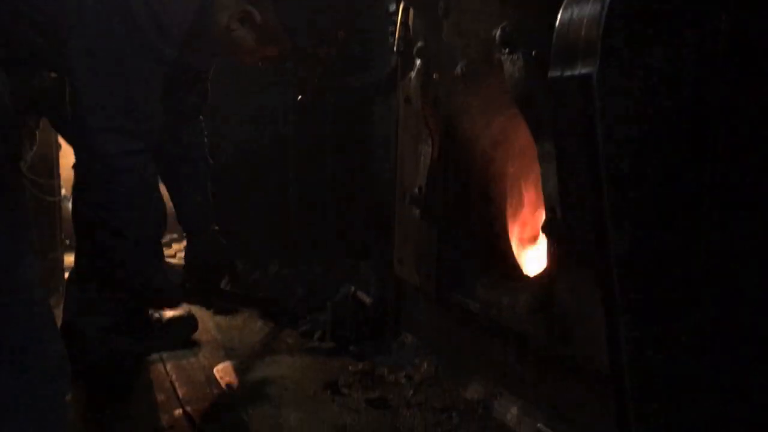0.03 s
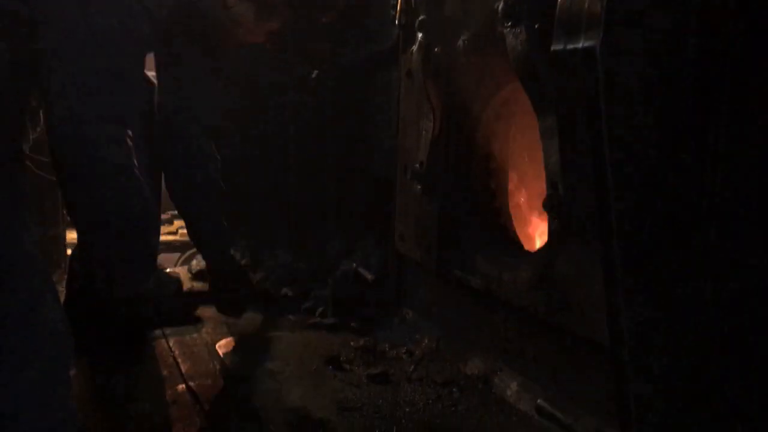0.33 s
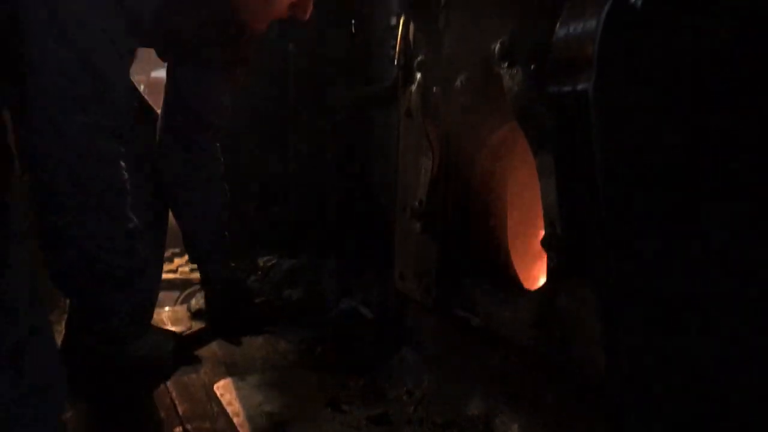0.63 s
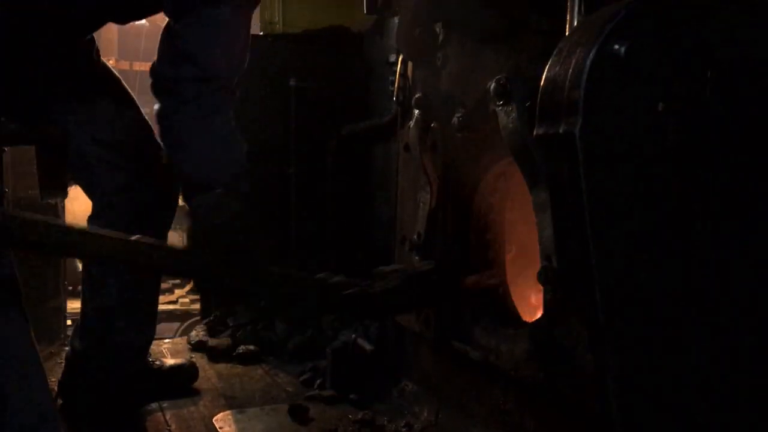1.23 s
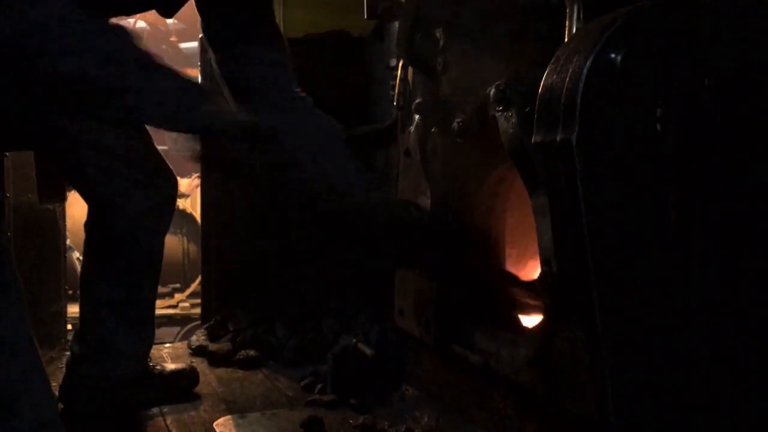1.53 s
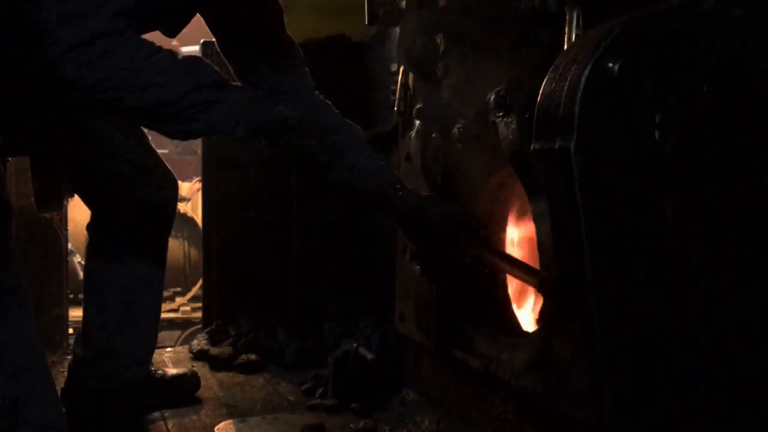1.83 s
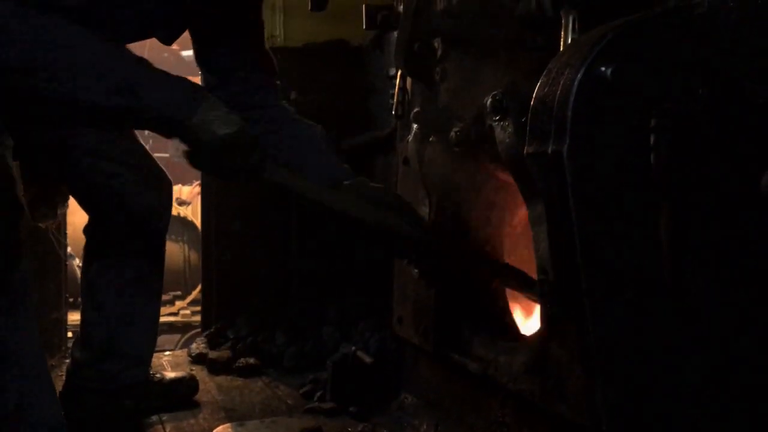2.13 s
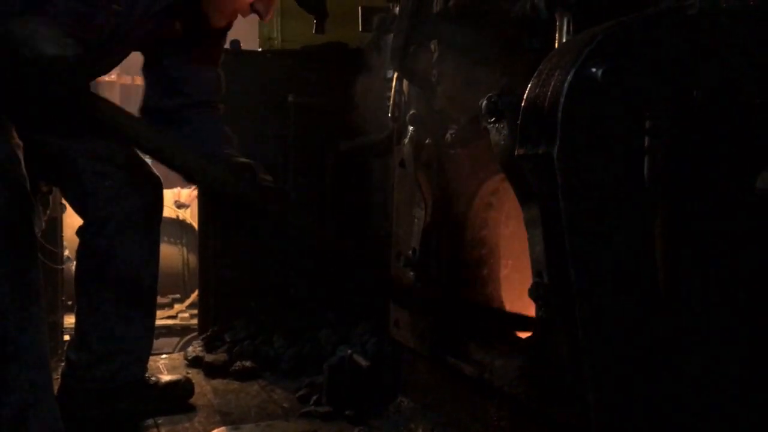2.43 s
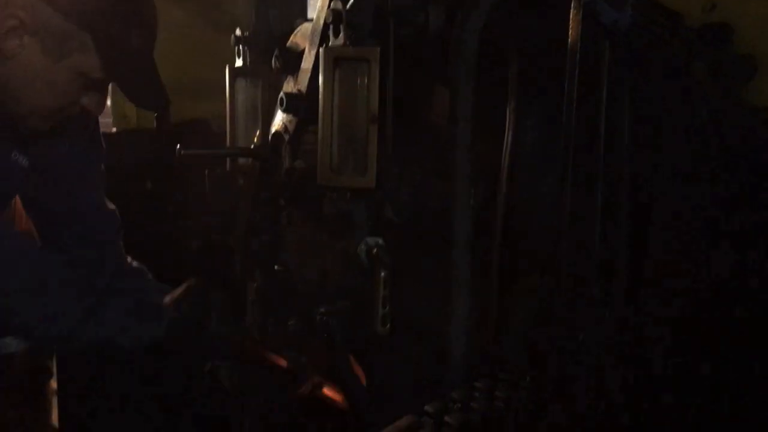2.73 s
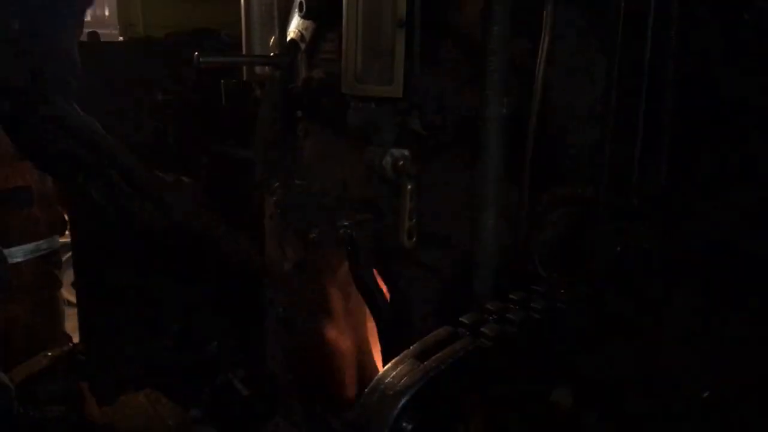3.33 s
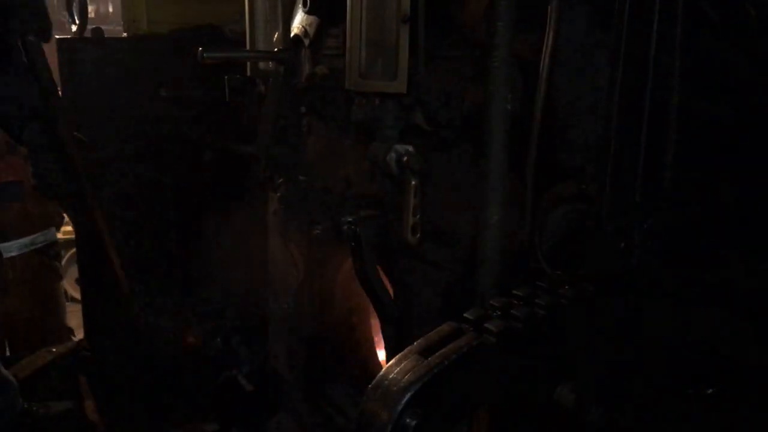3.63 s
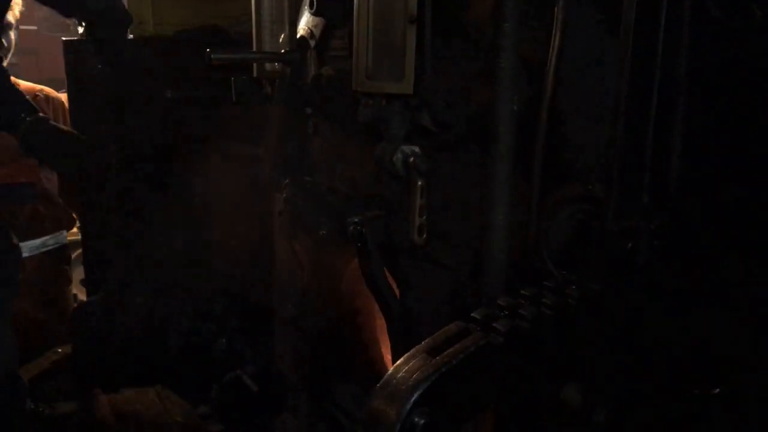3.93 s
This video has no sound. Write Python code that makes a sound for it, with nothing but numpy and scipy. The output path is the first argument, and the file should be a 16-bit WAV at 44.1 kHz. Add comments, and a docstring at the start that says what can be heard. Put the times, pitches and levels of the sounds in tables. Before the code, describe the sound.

Coal is shovelled close to the microphone in a steam locomotive's steel cab: a gritty scrape, dull knocks, then lumps sliding off the blade. Ringing clanks follow as the fire door is worked shut, while the fire rumbles softly.

```python
"""Inside a steam locomotive's cab, one microphone close to the fire door, steel walls all around.
The fire rumbles throughout under a faint hiss of steam. First a steel shovel scrapes into the coal,
then it knocks on the floor plate on its way to the door. At about 1.6 s the load slides off the blade
into the firebox. From 2.3 s blade and fire door clank, the boiler front booms and the door is worked
shut, grinding between its last clanks."""
import sys
import numpy as np
from scipy import signal
from scipy.fft import rfft, irfft
from scipy.io import wavfile

SR = 44100
rng = np.random.default_rng(int(sys.argv[2]) if len(sys.argv) > 2 else 0)


def wav_out(sig):
    """Save sig, one row per channel (or a flat mono array), as 16-bit PCM at SR to the path in sys.argv[1]."""
    wavfile.write(sys.argv[1], SR, np.round(np.clip(np.atleast_2d(sig).T, -1, 1) * 32767).astype(np.int16))


N = 176400
T = np.arange(N) / SR

# The fire. Each row: time in seconds, deep rumble in dB, the cab's boom in relative dB.
FIRE_LEVELS = [(0,-34.5,-34),(.77,-35,-36),(.97,-36.5,-44),(2.3,-39,-52),(2.62,-31.5,-50),(3.3,-38.5,-54),(3.52,-29.5,-40),(4.0,-41,-74)]
# Thuds of the boiler front. Each row: start in seconds, pitch in Hz, level in dB, t60 in seconds.
BOILER_THUDS = [(2.444,95.1,-19.5,0.74),(3.374,136,-15,0.11)]
# The fire door sliding. Each row: time in seconds, grinding in dB, rasp in dB.
DOOR_SLIDE = [(2.725,-64,-36.5),(2.745,-40,-30.5),(2.95,-34.5,-39),(3.11,-42.5,-42.5),(3.2,-23,-37),(3.32,-42.5,-46),(3.35,-34.5,-33)]
# Steel on steel. Each row: start in seconds, chatter length in seconds, five band levels, blade ring
# and door ring, all in relative dB, pitch of the struck spot in Hz.
STEEL_CLANKS = [(1.615,0.01,-60,-31,-18.5,-28,-37.5,-49,-44,1622),
                (1.645,0.0038,-63,-49,-19.5,-14,-22.5,-43,-30.5,1934),
                (1.947,0.0047,-45,-55,-23.5,-20.5,-21.5,-47,-64,2473),
                (2.266,0.012,-29.5,-25,-20,-36.5,-41,-23.5,-33.5,1340),
                (2.4236,0.0058,-28.5,-30,-16.5,-15,-16,-25.5,-32.5,1840),
                (2.509,0.0022,-26,-28,-27,-19,-14,-36,-26,1940),
                (2.528,0.01,-23.5,-21.5,-18.5,-22,-48,-26,-25.5,1480),
                (2.567,0.013,-31,-25.5,-14.5,-42,-24,-19.5,-43,1395),
                (2.827,0.028,-24.5,-15.5,-16,-15.5,-22,-12,-38,2086),
                (3.150,0.0079,-28.5,-25.5,-18.5,-22,-36,-22.5,-28,1135),
                (3.372,0.012,-29.5,-38,-30.5,-25,-32.5,-32.5,-31,1724)]
# Dull knocks on the floor. Each row: start in seconds, five band levels in dB.
FLOOR_KNOCKS = [(0.723,-15.5,-16.5,-22.5,-31,-31.5),(0.976,-17,-18.5,-16.5,-27,-39),(1.163,-22,-37,-27,-27,-37.5),(1.262,-31.5,-30.5,-25,-33,-41.5),(1.416,-31.5,-31.5,-33,-50,-49)]
# Single lumps and chips hitting steel. Each row: start in seconds, pitch in Hz, level in dB.
LUMP_HITS = [(.063,764,-14.5),(0.552,290,-26.5),(0.683,1320,-22.5),(0.733,426,-10.5),(0.82,278,-31),(1.085,375,-19),(1.279,5300,-37),(1.322,11100,-51),(1.391,1490,-31.5),(1.549,1070,-35),(1.607,1660,-21),(1.696,2000,-19.5),(1.84,8300,-29),(2.1,3530,-34.5),(3.135,3250,-31),(3.606,4450,-38.5)]
# The shovel driven into the coal, then swung to the door.
# Each row: time in seconds, crunch in dB, tumbling lumps in dB.
SHOVEL_SCOOP = [(0,-5,-20),(.06,-17,-21),(.165,-25.5,-27),(.258,-18.5,-27.5),(.285,-23,-25.5),(.365,-23,-17),(.41,-16,-26),(.492,-22,-22.5),(.58,-41,-36.5),(.66,-84,-68)]
SHOVEL_SWING = [(.66,-41.5,-35),(.85,-54.5,-34),(1.23,-47,-44.5),(1.32,-36.5,-30.5),(1.58,-37.5,-37.5),(1.7,-61,-42),(2.18,-50.5,-49),(2.22,-36,-29),(2.38,-60,-42.5)]
# Coal sliding off the blade. Each row: time in seconds, level in dB.
SHOVEL_THROW = [(1.6,-40.5),(1.685,-22.5),(1.73,-25.5),(1.79,-22.5),(1.93,-26),(2.04,-46)]

# Modes of the steel parts. Each row: frequency in Hz, relative level in dB, t60 in seconds.
BLADE_MODES = [(700,-5,.2),(915,-10,.2),(1350,-9,.2),(1548,-6,.24),(1796,-6,.26),(2096,1,.24),(2604,-6,.2),(2750,-5,.22),(3194,-8,.22),(3460,-10,.18),(3690,-7,.24),(4027,-12,.18)]
DOOR_MODES = [(770,-14,.4),(1082,-8,.42),(1443,-5,.35),(1545,-1,.4),(1723,0,.38),(2293,-9,.32),(3639,-7,.26)]
FLOOR_MODES = [(298,0,.28),(372,-2,0.26),(462,-6,0.17),(610,-8,.14)]
# The five bands of a blow: their six edges in Hz, then each band's t60 in seconds.
BAND_EDGES_HZ = [130, 600, 1500, 3000, 4500, 15500]
BAND_T60_S = [0.34,0.22,0.19,0.19,0.17]
# Partials of a struck spot, as multiples of its pitch.
SPOT_RATIOS = [1, 1.92, 3.32, 4.875]

# Spectra of the sources. Each row: frequency in Hz, relative level in dB.
STEAM_SPECTRUM = [(130,6.5),(400,1),(5000,-2.5),(15500,-11)]
STEEL_SPECTRUM = [(140,1),(280,-8.5),(450,-3),(720,2.5),(3000,-3),(15500,-29)]
KNOCK_SPECTRUM = [(200,-7),(330,-6),(2900,-18),(15500,-52)]
CRUNCH_SPECTRUM = [(900,8.5),(1800,8),(3700,1.5),(5000,-5.5),(15500,-23.5)]
TUMBLE_SPECTRUM = [(120,6.5),(190,-10.5),(300,1.5),(700,-7.5),(1200,-3.5)]
THROW_SPECTRUM = [(650,-9.5),(1100,-10.5),(1700,3),(3400,1.5),(5000,-7.5),(15500,-24.5)]
# The microphone's colour. Each row: frequency in Hz, gain in dB.
MIC_RESPONSE = [(25,-0.5),(3000,-1.5),(3700,-0.5),(5000,-5),(6500,2),(7500,-2.5),(9000,0.5),(10300,-2),(12000,1.5),(15500,-4.5)]

ATTACK_S = 0.0011


def amp(db):
    return 10 ** (np.asarray(db) / 20)


def unit(x):
    return x / np.sqrt(np.mean(x ** 2) + 1e-18)


def fade(t, t60):
    return np.exp(-np.log(1000) * np.maximum(t, 0) / t60)


def rise(t, length):
    return np.minimum(t / max(length, 1 / SR), 1)


def add(out, at, sound):
    start = max(int(at * SR), 0)
    out[start:start + len(sound)] += sound[:N - start]


def curve(table, column=1):
    """Gain over time from a column of dB points, dying away outside them."""
    points = np.array(table)
    outside_s = np.maximum(points[0, 0] - T, T - points[-1, 0])
    return amp(np.interp(T, points[:, 0], points[:, column])) * fade(outside_s, 0.27)


def band(x, lo_hz, hi_hz, order=3):
    """Band-pass, scaled to rms 1."""
    sos = signal.butter(order, [lo_hz, min(hi_hz, SR / 2 - 1)], 'band', fs=SR, output='sos')
    return unit(signal.sosfilt(sos, x))


def shape(x, spectrum):
    """Filter by (Hz, dB) points, falling away below the first."""
    hz, db = np.array(spectrum).T
    f = np.maximum(np.fft.rfftfreq(2 * N, 1 / SR), 1)
    gain = amp(np.interp(np.log(f), np.log(hz), db)) * np.minimum(f / hz[0], 1) ** 2
    return irfft(rfft(x, 2 * N) * gain)[:N]


def colour(x, spectrum):
    return unit(shape(x, spectrum))


def drone(lo_hz, hi_hz, steady, size=N):
    """One randomly driven resonance; a higher `steady` evens out its swings more."""
    swing = signal.hilbert(band(rng.standard_normal(size + SR), lo_hz, hi_hz, order=2))[SR:]
    return unit(swing.real / (np.abs(swing) + 0.47) ** steady)


def cab(x, t60=0.25, echo_db=3.5):
    """The microphone gets the direct sound and dense reflections from the close steel walls."""
    t = T[:SR // 3]
    echo = rng.standard_normal(len(t)) * fade(t, t60) * rise(t, 0.0021)
    return x + amp(echo_db) * signal.fftconvolve(x, echo / np.linalg.norm(echo))[:N]


def contacts(per_s, spread_db):
    """Tiny random contacts heard in the cab; a wider spread makes a few much harder than the rest."""
    strength = amp(spread_db * np.minimum(rng.exponential(size=N), 4))
    return cab((rng.random(N) < per_s / SR) * strength * rng.choice([-1, 1], N))


def ring(modes, scatter_db=2, detune=0.001):
    """Free ringing of a body; each blow weights and tunes its modes a little differently."""
    t, out, power = T[:SR], 0, 0
    for hz, db, t60 in modes:
        gain = amp(db + scatter_db * rng.standard_normal())
        pitch = hz * (1 + detune * rng.standard_normal())
        out = out + gain * fade(t, t60) * np.sin(2 * np.pi * (pitch * t + rng.random()))
        power += gain ** 2 / 2
    return out / np.sqrt(power)


def on_blade(scrape, ring_db):
    """A scrape plus the blade's modes, which it keeps ringing."""
    ringing = unit(signal.fftconvolve(scrape, ring(BLADE_MODES))[:N])
    return scrape + amp(ring_db) * np.std(scrape) * ringing


def chatter(spectrum, per_s, spread_db):
    """Rapid contacts, split into five bands."""
    rattle = colour(contacts(per_s, spread_db), spectrum)
    return [band(rattle, lo, hi, order=4) for lo, hi in zip(BAND_EDGES_HZ, BAND_EDGES_HZ[1:])]


def blow(bands, at, hold_s, band_dbs):
    """Chatter of one blow: the first instant stands out, then each band holds briefly and decays."""
    t, start = T[:SR // 2], int(at * SR)
    crack = (1 + amp(-8.5) * fade(t, t60=0.13)) * rise(t, ATTACK_S)
    return crack * sum(amp(db) * np.roll(rattle, -start)[:len(t)] * fade(t - hold_s, t60)
                       for rattle, db, t60 in zip(bands, band_dbs, BAND_T60_S))


def background_hiss():
    """A faint hiss, which the recorder's gain holds down at first and lifts after the first second."""
    recorder_gain = amp(np.interp(T, [.9, 1.5, 3.8], [-5, 1.5, -1]))
    return amp(-44.5) * colour(rng.standard_normal(N), STEAM_SPECTRUM) * recorder_gain


def fire():
    """The draught rumbles in the firebox and booms in the cab around the microphone."""
    rumble = drone(36, 52.5, steady=0.24) * curve(FIRE_LEVELS)
    boom = amp(0.5) * drone(80.8, 94, steady=0.87) * curve(FIRE_LEVELS, column=2)
    return rumble + boom


def boiler_thuds():
    """Heavy blows set the boiler front booming."""
    out, t = np.zeros(N), T[:SR]
    for at, hz, db, t60 in BOILER_THUDS:
        add(out, at, amp(db) * np.sin(2 * np.pi * hz * t) * fade(t, t60) * rise(t, 2 / hz))
    return out


def door_slide():
    """The fire door grinds and rasps as it slides."""
    rub = colour(contacts(per_s=1600, spread_db=0), STEEL_SPECTRUM)
    grind = band(rub, 310, 2200) * curve(DOOR_SLIDE)
    rasp = band(rub, 2720, 14000, order=2) * curve(DOOR_SLIDE, column=2)
    return on_blade(grind + rasp, ring_db=-9)


def floor_knocks():
    """The loaded shovel bumps on the floor plate, which rings low."""
    out, bands = np.zeros(N), chatter(KNOCK_SPECTRUM, per_s=3000, spread_db=0)
    for at, *band_dbs in FLOOR_KNOCKS:
        add(out, at, blow(bands, at, hold_s=0.0021, band_dbs=band_dbs))
        add(out, at, amp(band_dbs[0] + 1) * ring(FLOOR_MODES) * rise(T[:SR], 0.0014))
    return out


def coal_lumps(width_ratio=1.58):
    """Single lumps strike the steel: big ones clonk low, chips tick high and die slightly sooner."""
    out, t = np.zeros(N), T[:SR]
    for at, hz, db in LUMP_HITS:
        body = drone(hz / width_ratio, hz * width_ratio, steady=1, size=SR)
        t60 = 0.17 * (1000 / hz) ** 0.05
        add(out, at, amp(db) * body * rise(t, ATTACK_S) * fade(t, t60))
    return out


def struck_spot(pitch_hz, hold_s, band_dbs, half_width=0.03, step_db=-3.5):
    """Short resonances at the point of contact follow the blow's bands, each partial a step weaker."""
    t, out = T[:SR], 0
    for k, ratio in enumerate(SPOT_RATIOS):
        hz = pitch_hz * ratio
        in_band = np.searchsorted(BAND_EDGES_HZ[1:-1], hz)
        partial = drone(hz * (1 - half_width), hz * (1 + half_width), steady=1, size=SR)
        gain = amp(band_dbs[in_band] - 0.5 + k * step_db)
        out = out + gain * partial * fade(t - hold_s, BAND_T60_S[in_band])
    return out * rise(t, ATTACK_S)


def steel_clanks():
    """Steel chatters on steel; the struck spot rings briefly, blade and door build up and ring on."""
    out, bands = np.zeros(N), chatter(STEEL_SPECTRUM, per_s=2200, spread_db=2)
    for at, hold_s, *band_dbs, blade_db, door_db, spot_hz in STEEL_CLANKS:
        add(out, at, amp(-4) * blow(bands, at, hold_s, band_dbs))
        add(out, at, struck_spot(spot_hz, hold_s, band_dbs))
        ringing = amp(blade_db) * ring(BLADE_MODES) + amp(door_db) * ring(DOOR_MODES)
        add(out, at, amp(6.5) * ringing * rise(T[:SR], hold_s))
    return out


def catch_and_slip(depth_db=1.7, top_hz=45):
    """The blade catches and slips in the coal: a gain that lurches at random."""
    return amp(depth_db * band(rng.standard_normal(N), top_hz / 4, top_hz, order=2))


def shovelled_coal():
    """Close by, coal crunches and chips under the blade, tumbles, and slides off into the fire."""
    chips = amp(-15) * band(contacts(per_s=110, spread_db=2.8), 1700, 8700, order=1)
    crunch = band(colour(contacts(per_s=600, spread_db=1), CRUNCH_SPECTRUM), 790, 13000) + chips
    tumble = band(colour(contacts(per_s=500, spread_db=0.5), TUMBLE_SPECTRUM), 140, 750)
    slide = colour(contacts(per_s=2000, spread_db=2), THROW_SPECTRUM) + chips
    crunch *= curve(SHOVEL_SCOOP) + curve(SHOVEL_SWING)
    tumble *= curve(SHOVEL_SCOOP, column=2) + curve(SHOVEL_SWING, column=2)
    slide *= curve(SHOVEL_THROW)
    return on_blade(catch_and_slip() * (crunch + slide), ring_db=-13.5) + tumble


def scene():
    """Everything that reaches the one microphone in the cab."""
    shovelling = shovelled_coal() + coal_lumps() + floor_knocks()
    shutting = steel_clanks() + door_slide() + boiler_thuds()
    return (shovelling + shutting + fire() + background_hiss())[None]


def record(dry, ceiling=0.85, top_hz=16000):
    """The microphone colours the treble; the recorder rounds the loudest peaks and cuts the top."""
    rounded = ceiling * np.tanh(shape(dry[0], MIC_RESPONSE) / ceiling)
    low_pass = signal.ellip(8, .2, 70, top_hz, fs=SR, output='sos')
    return signal.sosfilt(low_pass, rounded)[None]


dry = scene()
out = record(dry)
wav_out(out)
```